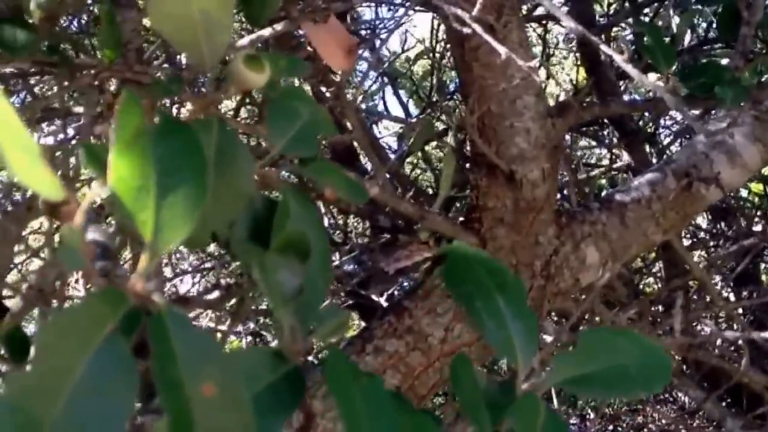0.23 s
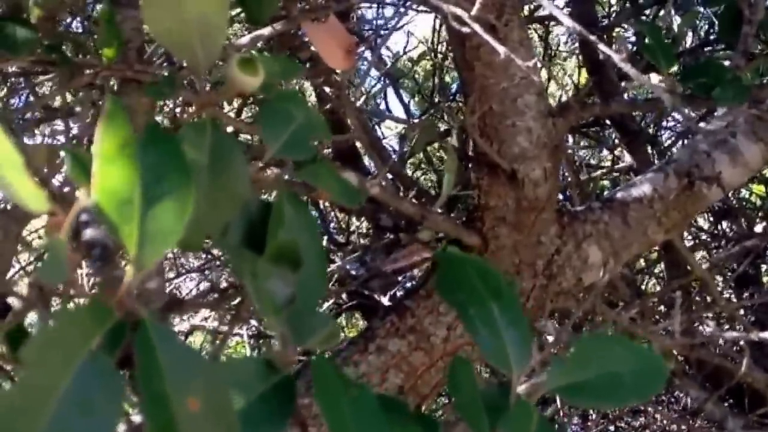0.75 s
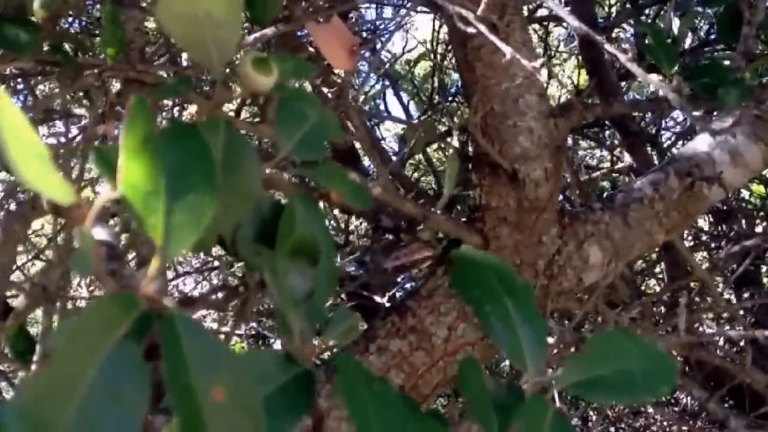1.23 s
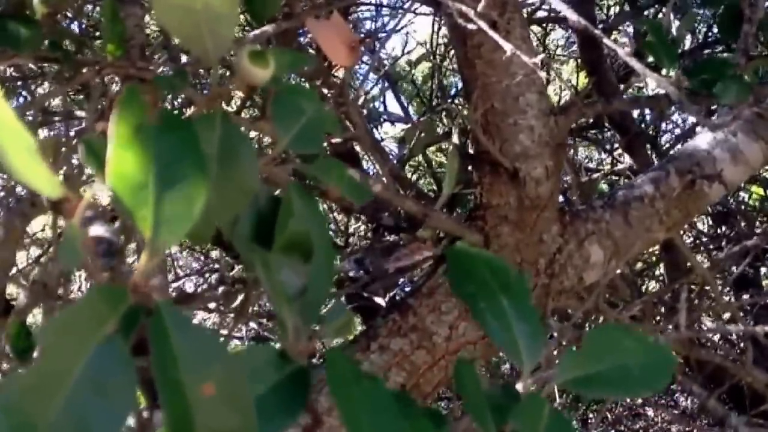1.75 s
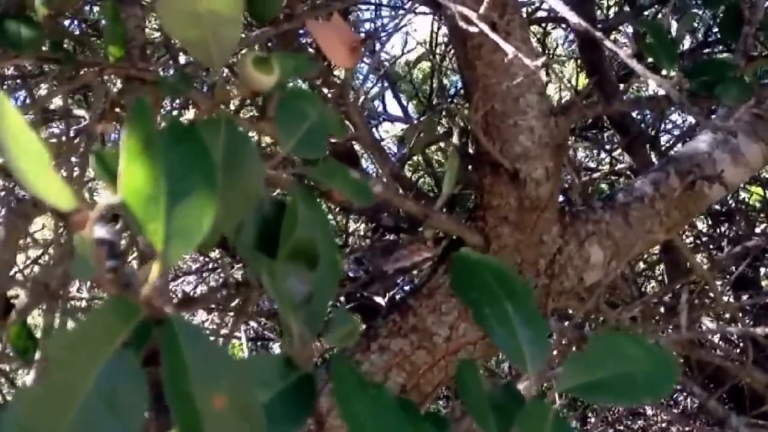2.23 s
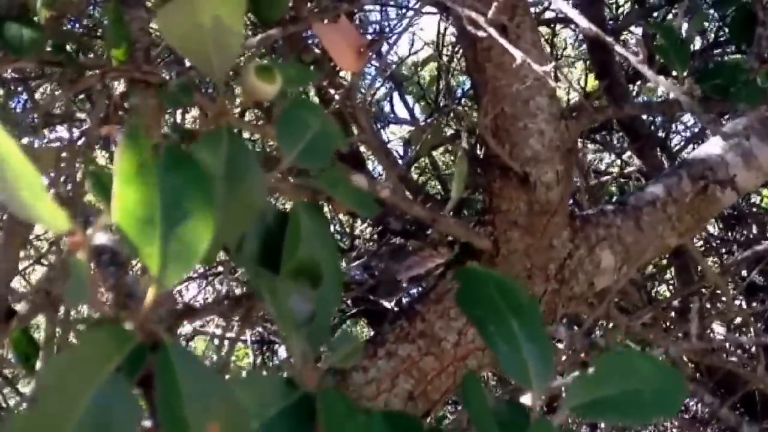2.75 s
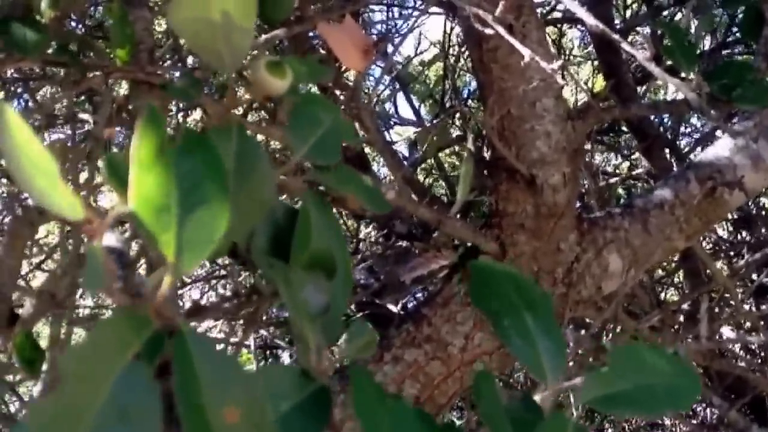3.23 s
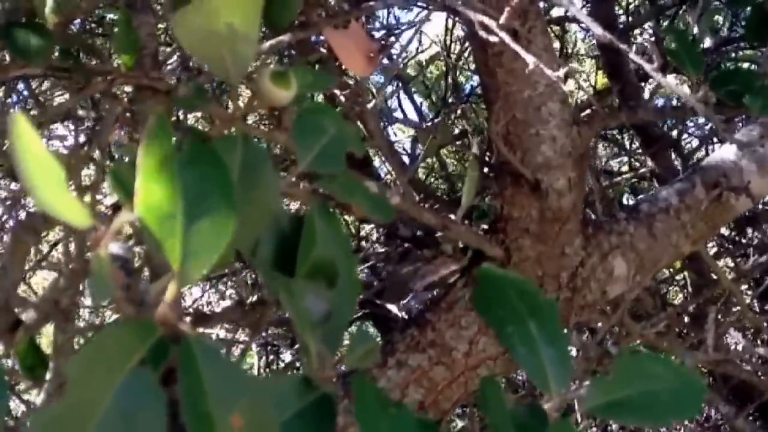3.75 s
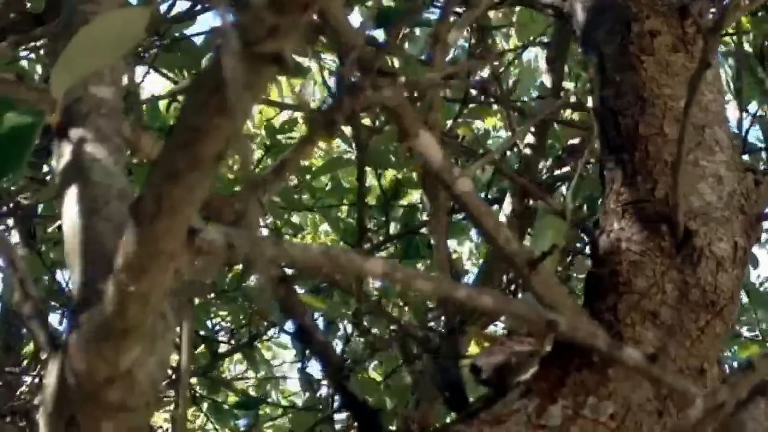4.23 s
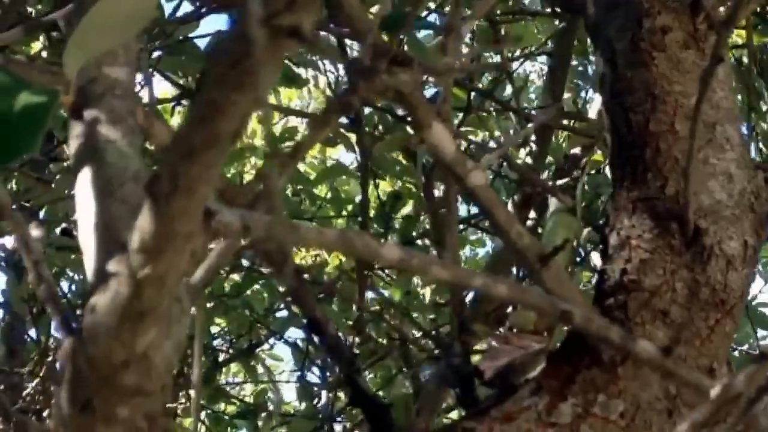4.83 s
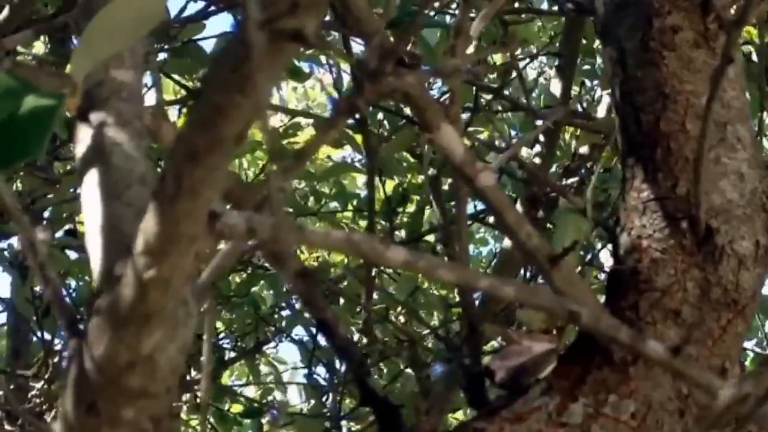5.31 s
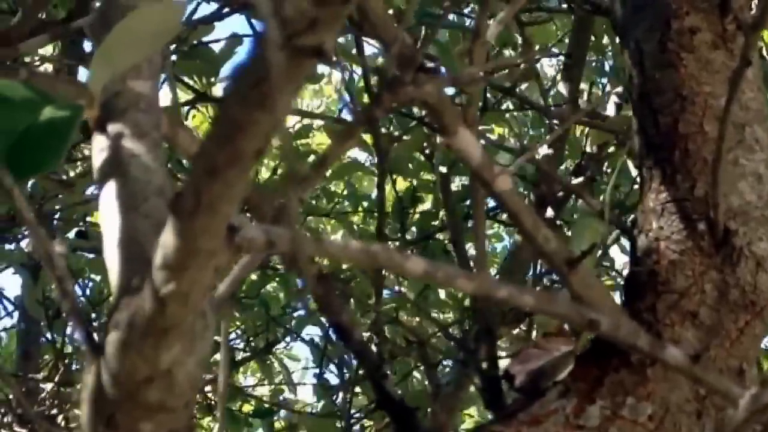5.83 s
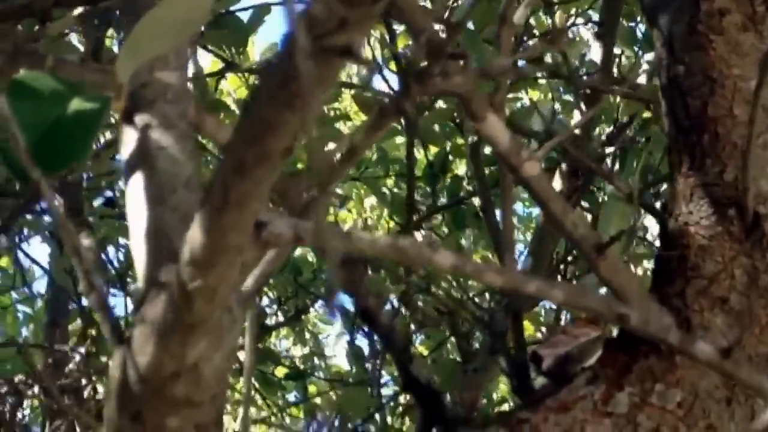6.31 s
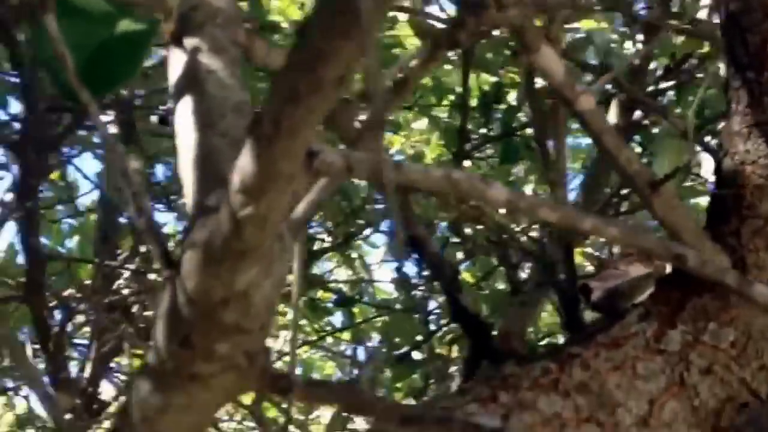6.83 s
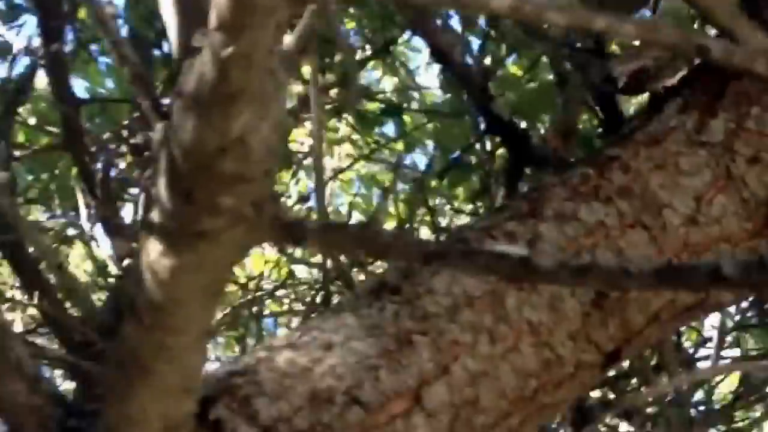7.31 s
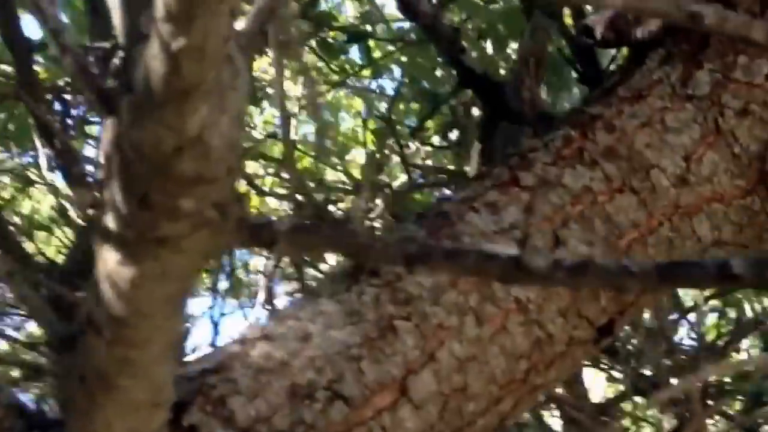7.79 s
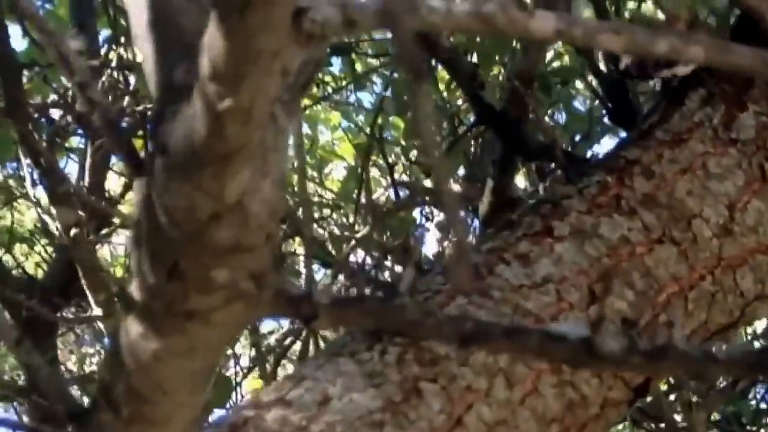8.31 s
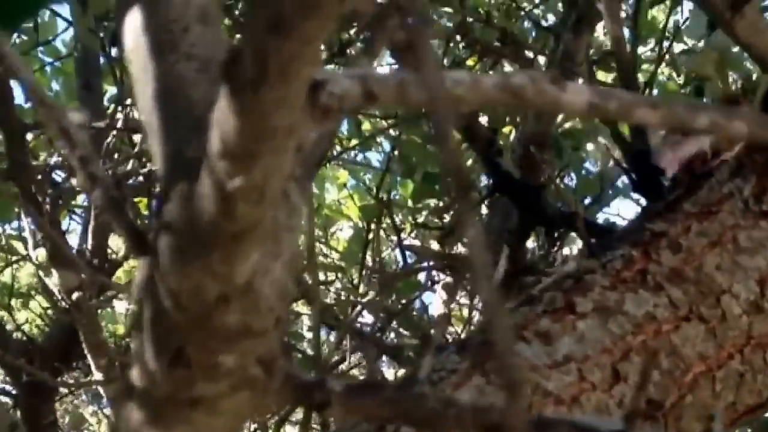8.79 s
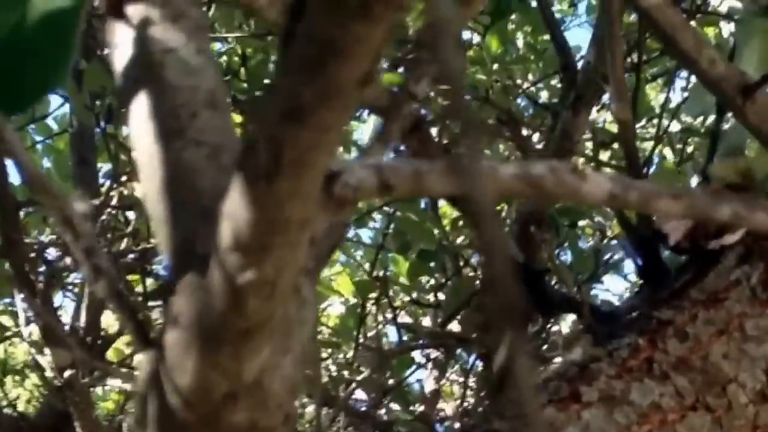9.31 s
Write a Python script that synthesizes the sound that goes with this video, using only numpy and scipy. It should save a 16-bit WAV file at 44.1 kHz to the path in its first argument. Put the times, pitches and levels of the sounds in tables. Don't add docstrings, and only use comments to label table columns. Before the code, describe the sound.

Outdoors in a tree, a cicada gives quick stuttered clicks, then a harsh, high rattling scream that weakens and slows into broken ticks. Quiet follows, with brief bursts. After a tiny silence the view is nearer and brighter, with scattered clicks thinning out. Knocks bump the hand-held camera, then a loud, steady scream runs to the end, with a few crisp leaf snaps. Soft wind puffs and a faint distant town wash lie behind.

```python
import sys
import numpy as np
from scipy import signal
from scipy.io import wavfile
from scipy.ndimage import uniform_filter1d

SR = 44100
rng = np.random.default_rng(int(sys.argv[2]) if len(sys.argv) > 2 else 0)


def master(y):
    cut = np.clip(np.atleast_2d(y).T, -1, 1)
    pcm = np.round(cut * 32767)
    wavfile.write(sys.argv[1], SR, pcm.astype(np.int16))


def voltage_ratio(decibels):
    exponent = np.asarray(decibels, float) / 20
    return 10 ** exponent


N = 421155

# freq_hz, level_db
GUST_SPECTRUM = [(40, -48), (82, -22), (130, 6.5), (220, 5), (330, -7.5), (500, -18.5), (900, -37)]
# freq_hz, density_db_per_hz
WASH_SPECTRUM = [(24, -54.5), (40, -49), (121, -13.5), (256, -9.5), (354, -3.5), (600, -16), (733, -7.5),
                 (965, -15.5), (1630, -18), (1810, -19), (2050, -23.5), (2570, -27), (8770, -32.5),
                 (14800, -55), (16000, -62.5)]
# time_s, level_db
BREEZE = [(0, -50.5), (3.3, -54), (3.45, -59), (9.55, -60)]
# peak_s, peak_db, fall_db_per_s
PUFFS = [(.33, -24, 600), (.74, -43, 150), (.93, -34, 300), (1.05, -23, 402), (1.3, -46, 200),
         (1.51, -45.5, 150), (1.67, -48, 200), (1.86, -34.5, 150), (1.97, -26.5, 398), (2.1, -33, 300),
         (2.34, -38, 200), (2.53, -30, 150), (2.58, -32, 200), (2.625, -30, 300), (2.95, -35, 300),
         (3.08, -28.5, 320), (3.19, -25.5, 202), (3.3, -39, 300), (3.54, -46, 300), (4.52, -53, 200),
         (5.13, -43, 150), (5.24, -35, 350), (6.25, -37.5, 200), (8.62, -47, 100), (8.88, -50, 100),
         (9.53, -42, 120)]
# time_s, pitch_hz, level_db
DRONE = [(5.3, 124, -57.5), (6.86, 130, -51), (8.62, 138.1, -55), (9.2, 140.3, -58)]
# start_s, end_s
GAP_S = (3.9875, 4.0345)
# start_s, peak_db, centre_hz
RUSTLES = [(3.504, -39, 9670), (3.5189, -28, 10800), (3.535, -28, 10600), (3.553, -34, 7930),
           (3.7394, -55, 7420), (3.9439, -34, 8690), (3.9606, -25, 9350), (3.972, -36, 11400),
           (8.5889, -13, 7760), (8.8767, -17, 7420), (9.098, -15, 8120)]
# start_s, peak_db, pitch_hz, treble_db
KNOCKS = [(6.363, -11.5, 1360, -8.5), (6.414, -20.5, 1210, -2), (6.461, -15.5, 1790, -8.5),
          (6.555, -23, 740, -6), (6.861, -48, 1176, 0), (7.001, 1, 1120, -16), (7.026, -20.5, 705, 1),
          (7.304, -10, 2360, -11), (7.3095, -6, 1830, -14), (7.318, -11, 2480, -3)]
# time_s, effort_db, rasp_db
SCREAMS = [
    [(.198, -34.5, 2), (.268, -30.5, -2.5), (.342, -29.5, 4.5), (.744, -23.5, -3.5), (.826, -28, 0),
     (1.07, -26.5, 4), (1.12, -25, 0.5), (1.296, -25, -0.5), (1.313, -29, -5)],
    [(1.358, -27.5, -1.5), (1.436, -31.5, 0), (1.956, -32, 1), (2.03, -31, -0.5), (2.554, -34, 1.5),
     (2.6, -36, -1)],
    [(6.985, -28, 4), (7.03, -21, 1), (7.13, -17.5, -1), (8.14, -18, 0), (8.4, -19.5, 0.5), (8.6, -23, 1),
     (9.22, -22.5, -1), (9.49, -24.5, 1), (9.55, -29, 4)],
]
# time_s, pulls_hz, unsteady_ms, rib_gap_ms
RHYTHMS = [
    [(.198, 92, .4, 1.6), (.3, 108, .2, 1.6), (.53, 114, .12, 1.65), (.74, 115, .12, 1.65),
     (.8, 100, .6, 1.7), (.88, 106, .3, 1.7), (1, 115, .15, 1.74), (1.313, 115, .15, 1.74)],
    [(1.358, 92, .35, 1.45), (2, 91, .3, 1.45), (2.25, 84, .35, 1.5), (2.6, 73, .4, 1.55)],
    [(6.985, 100, .3, 1.95), (7.08, 106, .08, 1.92), (7.44, 110, .05, 1.83), (7.9, 112.5, .05, 1.78),
     (8.3, 113, .1, 1.77), (8.45, 110, .2, 2.27), (9, 104, .3, 2.35), (9.3, 109, .25, 2.28),
     (9.55, 95, .4, 2.4)],
]
# low_db, overtone_db, snap_db, max_second_drum_loss_db_per_rib
VOICES = [(-0.5, -3.5, -8, 5), (-2, -5, -11, 0), (-6, -5, -13, 9)]
RASP_SHARE = (0.39, 0.76, 1.0)
SKIPPED_S = [.795, 2.247, 2.286, 2.362, 2.478, 2.495]
# first_pull_s, last_pull_s, pulls_count, level_db
BURSTS = [(.0005, .0073, 2, -27.5), (.0232, .0379, 3, -26), (.0634, .0693, 2, -27),
          (.0861, .0917, 2, -26.5), (.1733, .1941, 4, -27), (2.6051, 2.6118, 2, -29),
          (2.6385, 2.6602, 4, -29.5), (2.6825, 2.688, 2, -29), (2.7142, 2.7198, 2, -27),
          (3.5635, 3.618, 9, -26), (3.9042, 3.9125, 2, -25.5), (4.0354, 4.0837, 8, -22),
          (4.0994, 4.115, 3, -23), (4.1317, 4.1403, 2, -22.5), (4.1627, 4.1707, 2, -22),
          (4.1866, 4.2558, 10, -22.5), (4.2714, 4.278, 2, -23.5), (4.2938, 4.314, 4, -24),
          (4.3441, 4.3603, 3, -23), (4.3947, 4.41, 3, -24), (4.4268, 4.4339, 2, -25),
          (4.4728, 4.4772, 2, -25.5), (4.6389, 4.6758, 7, -23), (6.7485, 6.7565, 2, -28.5),
          (6.9072, 6.9227, 4, -27), (6.9401, 6.9785, 7, -26.5)]
# start_s, level_db
LONE = [(.1297, -26), (1.3156, -20), (1.338, -23), (2.6258, -29), (2.7632, -29), (2.8251, -26),
        (4.3288, -23), (4.3778, -24), (4.6184, -27), (4.7443, -25), (4.7668, -25), (4.8017, -25),
        (4.8351, -23), (4.8576, -23), (4.915, -22), (4.9558, -23), (4.9908, -26), (5.0487, -26),
        (5.4434, -25), (5.4916, -26), (6.0444, -26), (6.8833, -30)]
# low_db, overtone_db, snap_db
STUTTER_COLOUR_DB = (-3, -3.5, -8)
# pitch_ratio, level_db
RIBS = [(.985, -1), (1.0, 0), (1.015, -1.5)]
# time_s, low_hz, main_hz, slack_0_to_1
BELLY = [(0, 3380, 4030, 0.66), (.72, 3600, 4470, 0.27), (1.04, 3550, 4180, 0.058),
         (1.33, 3480, 4170, 0.11), (1.9, 3570, 4040, .9), (2.6, 3370, 3980, 1), (4, 3500, 4040, .8),
         (4.04, 3440, 4250, 0.84), (6.9, 3490, 4280, 0.47), (7, 3100, 4390, .4), (7.2, 3530, 4385, 0.029),
         (8, 3403, 4430, 0), (8.3, 3220, 4230, 0), (8.6, 3100, 4230, 0.58), (9, 3160, 4210, 0),
         (9.55, 3283, 4260, .2)]
# pitch_ratio, width_ratio, level_db
RINGS = [
    (1.0, 1.0, 0),
    (1.0, 1.1, -9),
    (1.0, 1.0, 1.5),
    (.83, 1.6, -5.5),
]
# effort_db, main_width_hz
WIDTHS = [(-27.5, 340), (-22, 290), (-12.5, 160)]
# centre_hz, width_hz, level_db
UPPER = [
    [(8150, 480, 4), (6830, 950, 2.5), (5210, 620, 1), (9150, 940, -4.5)],
    [(10750, 2500, 4), (13940, 2900, 0)],
]
# centre_hz, width_hz
NOTCHES = [(5120, 420), (9220, 650)]


def evened(x):
    return x / np.sqrt(np.mean(x ** 2) + 1e-20)


def curve(rows, t):
    s, *columns = np.transpose(rows)
    return [np.interp(t, s, c) for c in columns]


def noise(spectrum, patchy_db):
    frames, hz = N // 256 + 5, np.fft.rfftfreq(1024, 1 / SR)
    real, imag, patches = rng.standard_normal((frames, 513, 3)).T
    patches = evened(uniform_filter1d(uniform_filter1d(patches, size=8, axis=0), size=10, axis=1))
    f, db = np.transpose(spectrum)
    colour_db = np.interp(np.log(hz + 1), np.log(f), db)[:, None]
    bins = (real + 1j * imag) * voltage_ratio(colour_db + patchy_db * patches)
    return evened(signal.istft(bins, nperseg=1024, noverlap=768)[1][:N])


def band(x, lo_hz, hi_hz):
    return signal.sosfilt(signal.butter(2, [lo_hz, hi_hz], "bandpass", fs=SR, output="sos"), x)


def highpass(x, order, hz):
    return signal.sosfilt(signal.butter(order, hz, "highpass", fs=SR, output="sos"), x)


def ring(hz, width_hz, size=400):
    t = np.arange(size) / SR
    x = np.exp(-np.pi * width_hz * t) * np.sin(2 * np.pi * hz * t)
    return x / np.linalg.norm(x)


def add(mix, s, sound):
    part = mix[round(s * SR):][:len(sound)]
    part += sound[:len(part)]


def gust_strength():
    t = np.arange(N) / SR
    slow = t[::64]
    puffs = sum(voltage_ratio(db - fall * abs(slow - s)) for s, db, fall in PUFFS)
    return np.interp(t, slow, voltage_ratio(curve(BREEZE, slow)[0]) + puffs)


def town_wash(gusts):
    wash = noise(WASH_SPECTRUM, patchy_db=1.4)
    level = voltage_ratio(-49.5) + voltage_ratio(-35) * uniform_filter1d(gusts, size=8000)
    return wash * level / np.std(band(wash, 480, 1750))


def wind(gusts):
    lumps = evened(uniform_filter1d(uniform_filter1d(rng.standard_normal(N), size=700), size=700))
    rumble = band(noise(GUST_SPECTRUM, patchy_db=2.2), 93, 850)
    return voltage_ratio(-5.0) * gusts * evened(rumble * voltage_ratio(1.2 * lumps))


def engine_drone():
    t = np.arange(N) / SR
    hz, db = curve(DRONE, t)
    fade = np.clip(np.minimum(t - DRONE[0][0], DRONE[-1][0] - t) / .3, 0, 1)
    return np.sqrt(2) * voltage_ratio(db) * fade * np.sin(2 * np.pi * np.cumsum(hz) / SR)


def background():
    gusts = gust_strength()
    mic_hiss = voltage_ratio(-62.5) * band(rng.standard_normal(N), 11000, 15000)
    return town_wash(gusts) + wind(gusts) + mic_hiss + engine_drone()


def rustles():
    out, t = np.zeros(N), np.arange(2500) / SR
    for s, db, hz in RUSTLES:
        lumps = uniform_filter1d(rng.standard_normal(len(t)), size=30)
        crackle = rng.standard_normal(len(t)) * voltage_ratio(1.33 * lumps * 1.7)
        shape = voltage_ratio(-60 * t / 0.0038) + voltage_ratio(-14.5 - 60 * t / 0.2)
        add(out, s, voltage_ratio(db) * shape * (band(crackle, 0.6 * hz, 1.9 * hz) + .5 * band(crackle, 3500, 15000)))
    return out


def knocks():
    out, t = np.zeros(N), np.arange(400) / SR
    for s, db, hz, treble_db in KNOCKS:
        blow = -np.sin(2 * np.pi * hz * t - .9) * (t * hz * 2.1) * np.exp(1 - t * hz * 3.03)
        tick = band(rng.standard_normal(len(t)), 2300, 5200)
        tick = tick + 0.15 * band(rng.standard_normal(len(t)), 11300, 13200)
        tick *= voltage_ratio(-60 * t / 0.0027) + voltage_ratio(-23 - 60 * t / 0.033)
        add(out, s + 0.00043, voltage_ratio(db + 2.5) * (blow + voltage_ratio(treble_db + 12) * tick))
    return highpass(out, 2, 700)


def foliage(x):
    t, out = np.arange(6000) / SR, np.zeros(N)
    for k in range(3):
        tail = rng.standard_normal(len(t)) * (rng.random(len(t)) < .1) * (t > .0012)
        tail *= voltage_ratio(-60 * t / .05) + voltage_ratio(-21 - 60 * t / .35)
        turn = np.cos(np.pi * (np.arange(N) / SR * .9 + k / 3)) * np.sqrt(2 / 3)
        out += signal.oaconvolve(x * turn, tail / np.linalg.norm(tail))[:N]
    return out


def stutter_pulls():
    slip_ms, spread_db = .6, .8
    rows = [LONE]
    for first, last, count, db in BURSTS:
        slip, spread = rng.standard_normal((count, 2)).T
        inner = np.isin(np.arange(count), (0, count - 1), invert=True)
        s = np.linspace(first, last, count) + inner * slip * slip_ms / 1000
        rows.append(np.c_[s, db + spread_db * spread])
    s, db = np.vstack(rows).T
    low_db, over_db, snap_db = STUTTER_COLOUR_DB
    far_snap_db = snap_db - 5 * (s < GAP_S[0])
    same = np.ones(len(s))
    return np.c_[s, db - 6.5, low_db * same, over_db * same, far_snap_db, 1.55 * same, -1.7 * same]


def scream_pulls(levels, rhythm, voice):
    t = np.arange(levels[0][0], levels[-1][0], 1 / SR)
    turns = np.cumsum(curve(rhythm, t)[0]) / SR
    s = t[np.flatnonzero(np.diff(turns // 1, prepend=-1))]
    rate_hz, unsteady_ms, gap_ms = curve(rhythm, s)
    loss_db = voice[-1] * np.clip(1 - unsteady_ms / .6, 0, 1)
    lag_turns = .5 + .013 * loss_db
    effort_db, rasp_db = curve(levels, s)
    colour_db = [db + share * rasp_db for db, share in zip(voice, RASP_SHARE)]
    slip_s = unsteady_ms / 1000 * rng.standard_normal((len(s), 2)).T
    left = [s + slip_s[0], effort_db + 0.5, *colour_db, gap_ms, 0 * s]
    right = [s + lag_turns / rate_hz + slip_s[1], effort_db - 0.5, *colour_db, gap_ms, loss_db]
    rows = np.r_[np.transpose(left), np.transpose(right)]
    return rows[abs(rows[:, :1] + .002 - SKIPPED_S).min(axis=1) > .0036]


def rib_clicks(pulls):
    s, db, low_db, over_db, snap_db, gap_ms, loss_db = pulls.T
    low_hz, main_hz, slack = curve(BELLY, s)
    side_hz = main_hz * (1.18 + (1.12 - 1.18) * slack)
    main_width_hz = curve(WIDTHS, db)[0]
    modes_hz = (main_hz, side_hz, low_hz, low_hz)
    lift_db = (0, 8 * slack, low_db, low_db + 24 * np.log10(main_width_hz / 300))
    belly, upper, t = np.zeros(N + 300), np.zeros((2, N)), np.arange(300) / SR
    fold = (1 - np.exp(-t / .00008)) * np.clip((.003 - t) / .0016, 0, 1)
    for k, (pitch, rib_db) in enumerate(RIBS):
        chance = rng.standard_normal((len(s), 9)).T
        at_s = s + (k * gap_ms + .04 * chance[0]) / 1000
        at = np.clip(at_s * SR, 0, N - 1).astype(int)
        click_db = db + rib_db - k * loss_db + .9 * chance[1]
        spots = (at[:, None] + np.arange(300)).ravel()
        for j, (factor, wider, mode_db) in enumerate(RINGS):
            hz = modes_hz[j] * factor * pitch * (1 + .008 * chance[2])
            carried_s = (j == 2) * k * gap_ms / 1000
            width_hz = wider * main_width_hz
            size = voltage_ratio(click_db + mode_db + lift_db[j] + 1.1 * chance[3 + j])
            size = (1, -1, -1, 1)[j] * size * np.sqrt(4 * np.pi * width_hz / SR)
            decay = np.exp(-np.pi * np.outer(width_hz, t)) * fold
            swing = np.sin(2 * np.pi * hz[:, None] * (t + carried_s[:, None]))
            belly += np.bincount(spots, (size[:, None] * decay * swing).ravel(), N + 300)
        for j, group_db in enumerate((over_db, snap_db)):
            upper[j] += np.bincount(at, voltage_ratio(click_db + group_db + 1.9 * chance[7 + j]), N)
    return belly[:N], upper


def upper_hiss(clicks, modes):
    puff = voltage_ratio(-60 * np.arange(300) / SR / .009)
    hiss = signal.oaconvolve(clicks, puff / np.linalg.norm(puff))[:N] * rng.standard_normal(N)
    body = sum(voltage_ratio(db) * ring(hz, w) * (-1) ** j for j, (hz, w, db) in enumerate(modes))
    return signal.oaconvolve(0.38 * (clicks + 1.474 * hiss), body / np.linalg.norm(body))[:N]


def bark_notches(x):
    t = np.arange(N) / SR
    depth = np.clip(curve(BELLY, t)[-1] * .8 + .2, 0, 1)
    for (hz, width_hz), share in zip(NOTCHES, (depth, 0.12 + 0.93 * (t > GAP_S[0]))):
        x = x + share * (signal.lfilter(*signal.iirnotch(hz, hz / width_hz, SR), x) - x)
    return x


def cicada():
    screams = [scream_pulls(*one) for one in zip(SCREAMS, RHYTHMS, VOICES)]
    out, upper = rib_clicks(np.vstack([stutter_pulls()] + screams))
    for clicks, modes in zip(upper, UPPER):
        out = out + upper_hiss(clicks, modes)
    out = bark_notches(out)
    far, near = highpass(out, 4, 2950), highpass(out, 4, 2550)
    near = near + 0.64 * band(near, 11550, 15600)
    return voltage_ratio(19.5) * np.where(np.arange(N) / SR < GAP_S[0], far, near)


def scene():
    song = cicada()
    return (song + voltage_ratio(-10.5) * foliage(song) + knocks() + rustles() + background())[None]


def low_pass(x):
    return signal.sosfilt(signal.butter(12, 16170, fs=SR, output="sos"), x)


def record(dry):
    t = np.arange(N) / SR
    cut = dry * ((t < GAP_S[0]) | (t > GAP_S[1]))
    edge = signal.firwin(255, 15450, window=("kaiser", 8), fs=SR)
    return low_pass(signal.oaconvolve(cut, edge[None], "same"))


dry = scene()
out = record(dry)
master(out)
```